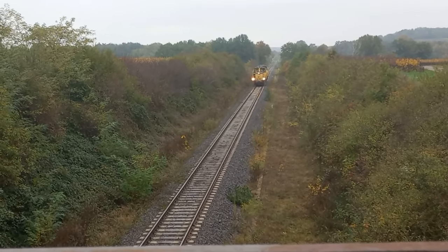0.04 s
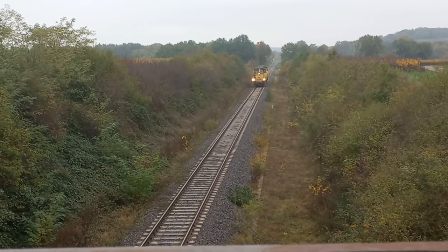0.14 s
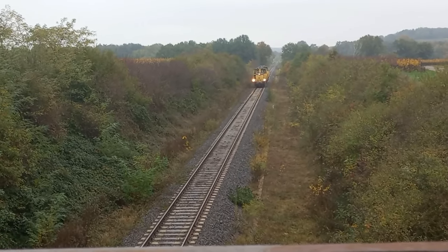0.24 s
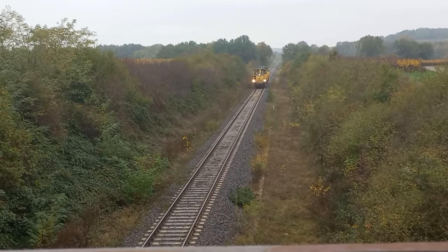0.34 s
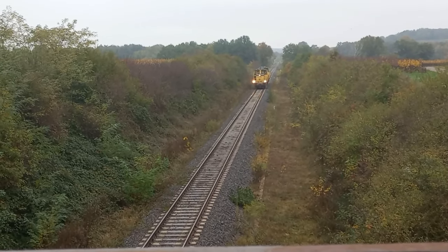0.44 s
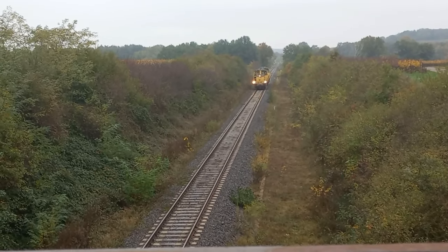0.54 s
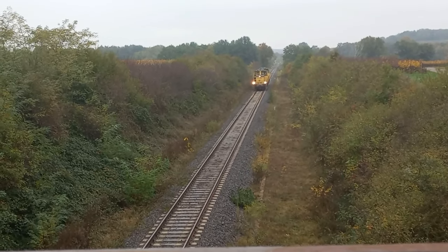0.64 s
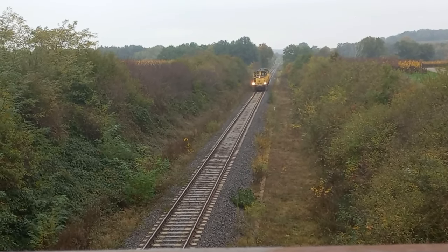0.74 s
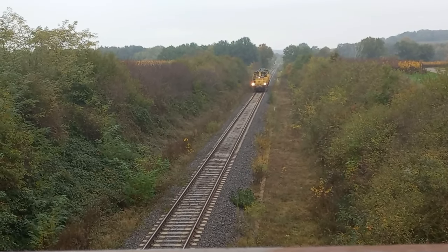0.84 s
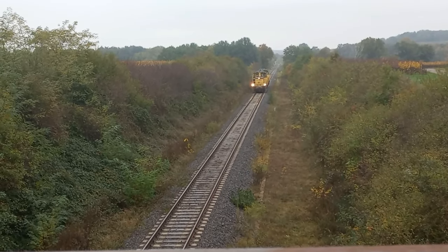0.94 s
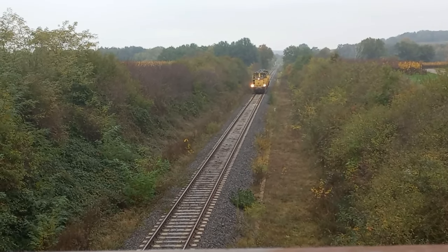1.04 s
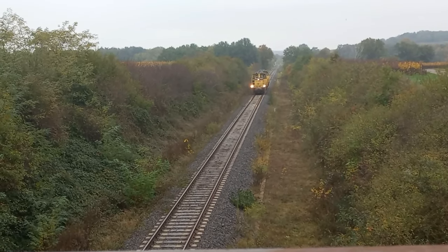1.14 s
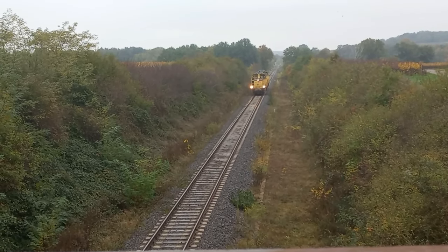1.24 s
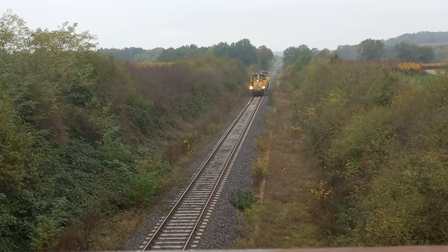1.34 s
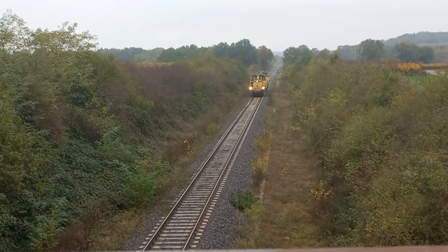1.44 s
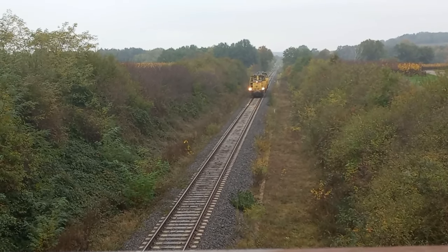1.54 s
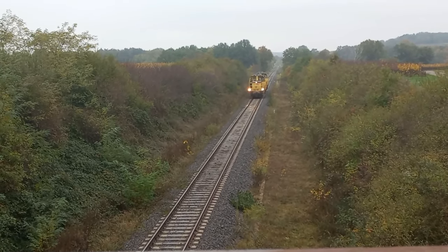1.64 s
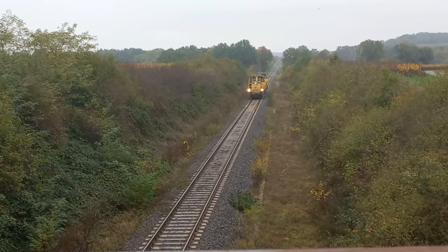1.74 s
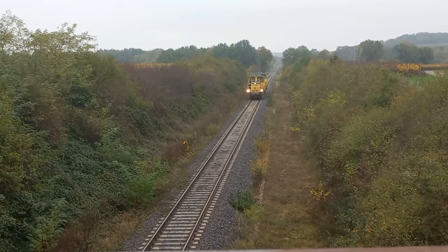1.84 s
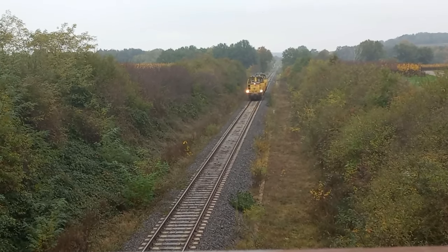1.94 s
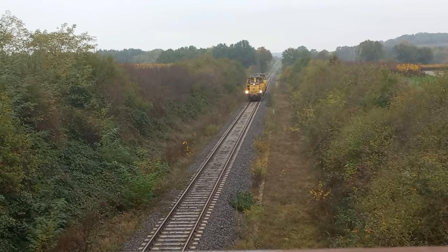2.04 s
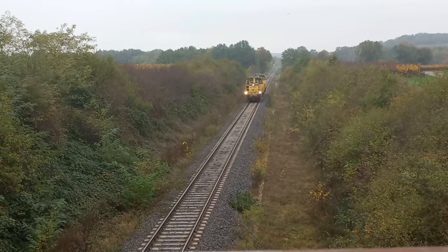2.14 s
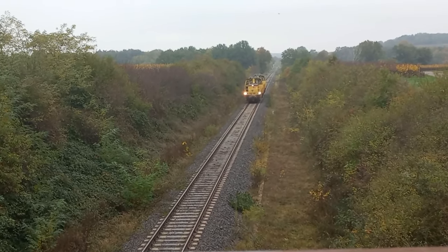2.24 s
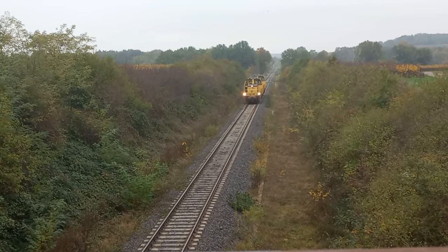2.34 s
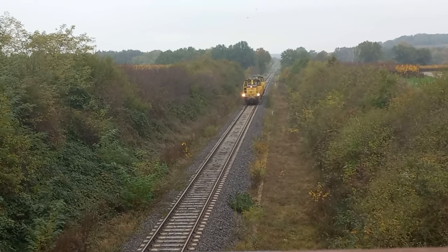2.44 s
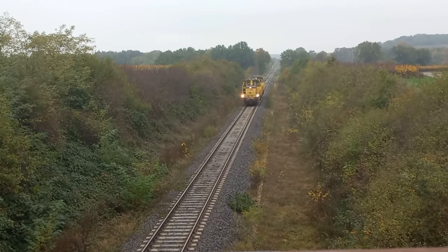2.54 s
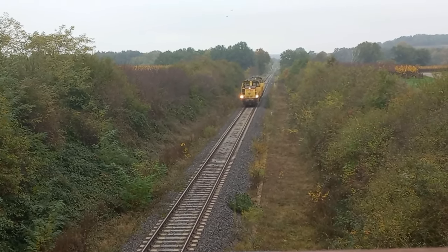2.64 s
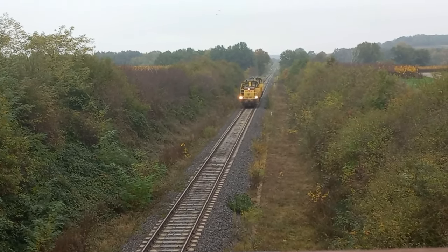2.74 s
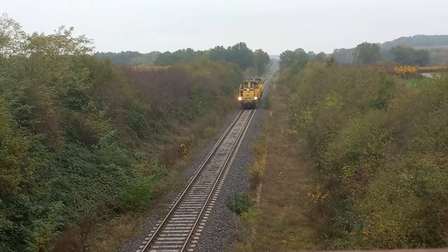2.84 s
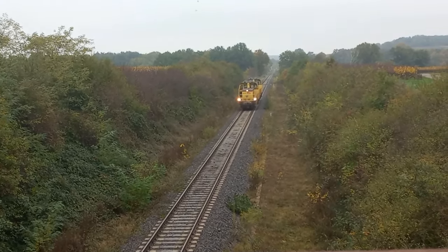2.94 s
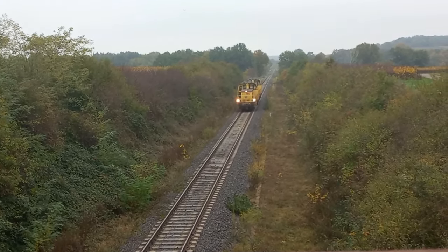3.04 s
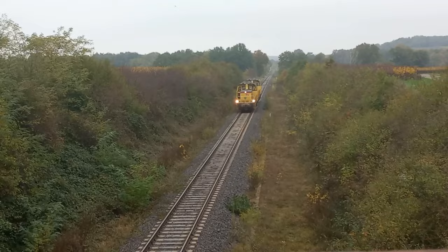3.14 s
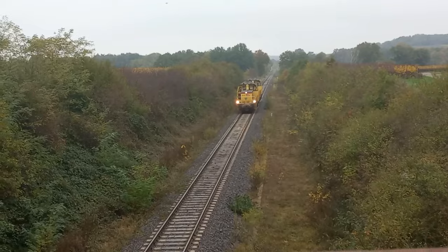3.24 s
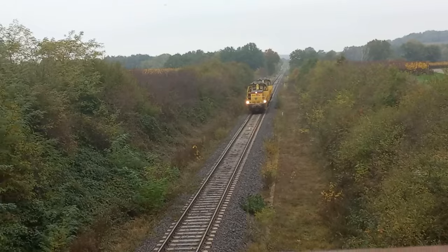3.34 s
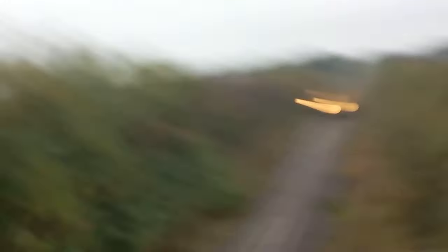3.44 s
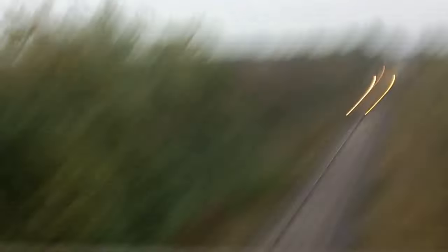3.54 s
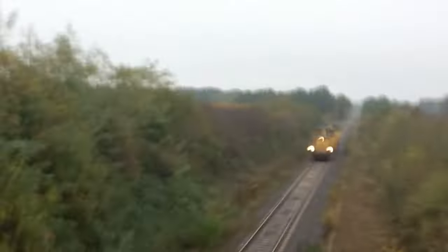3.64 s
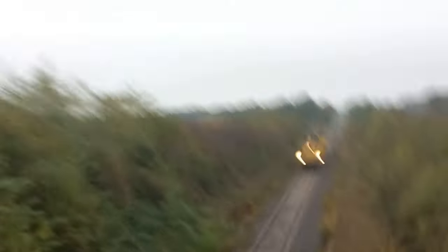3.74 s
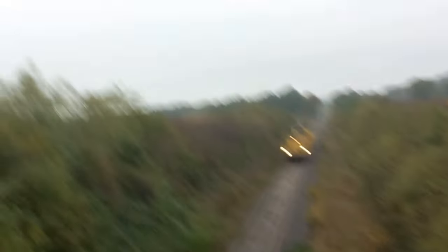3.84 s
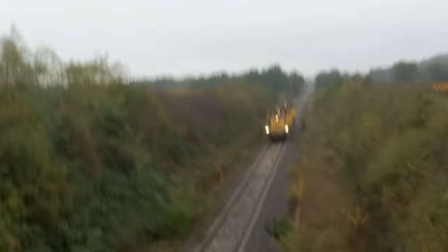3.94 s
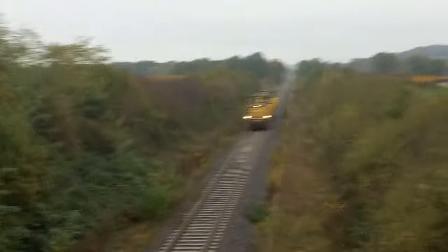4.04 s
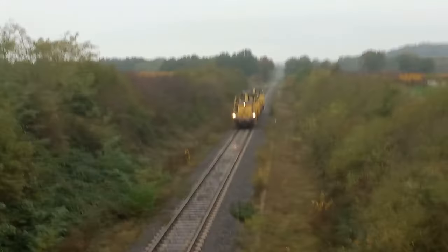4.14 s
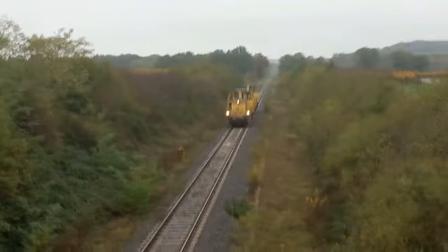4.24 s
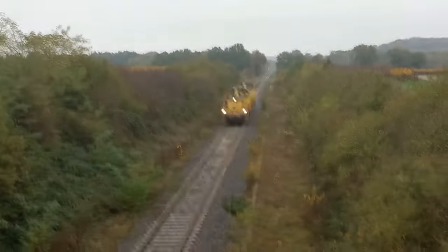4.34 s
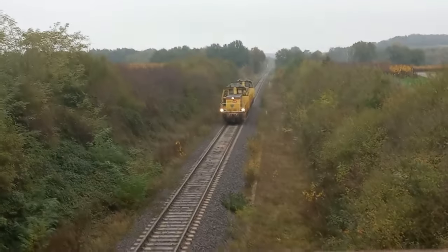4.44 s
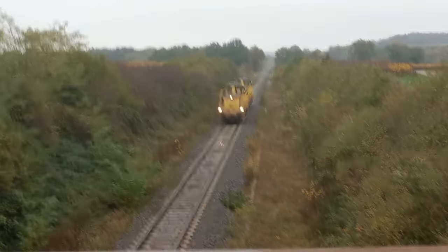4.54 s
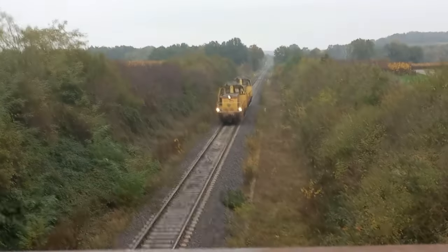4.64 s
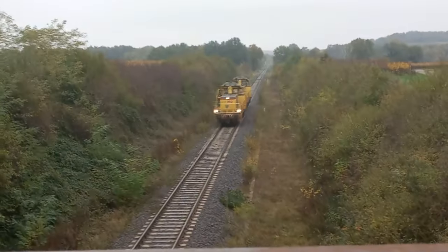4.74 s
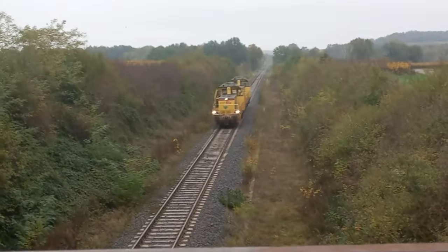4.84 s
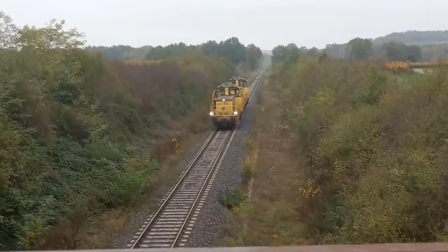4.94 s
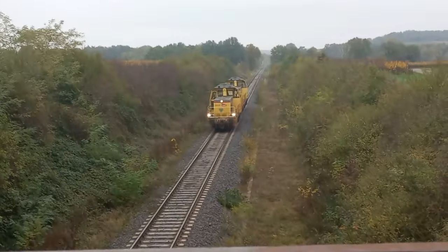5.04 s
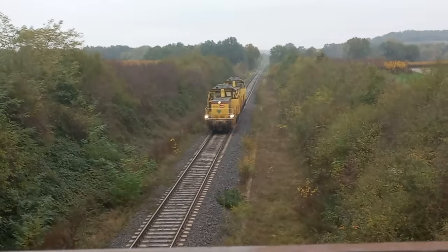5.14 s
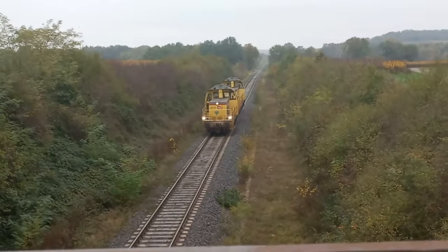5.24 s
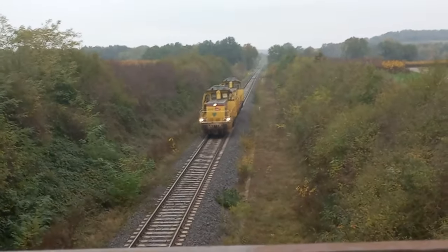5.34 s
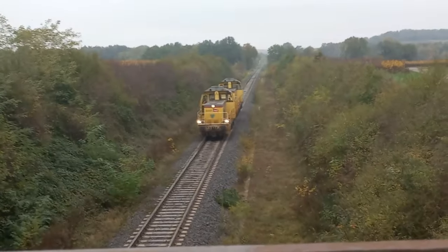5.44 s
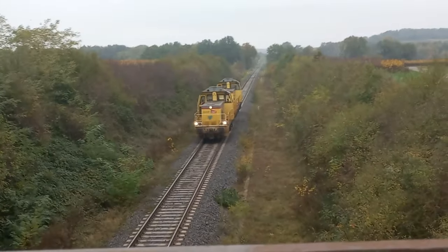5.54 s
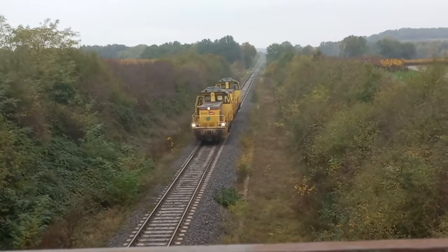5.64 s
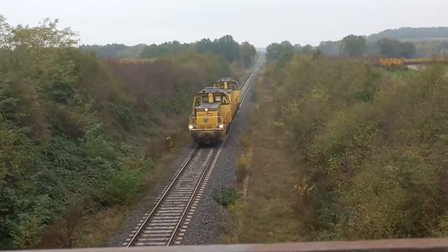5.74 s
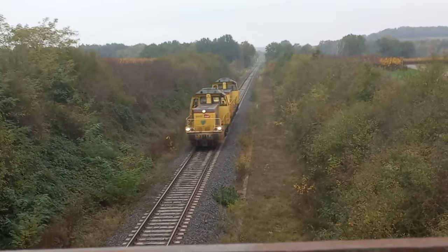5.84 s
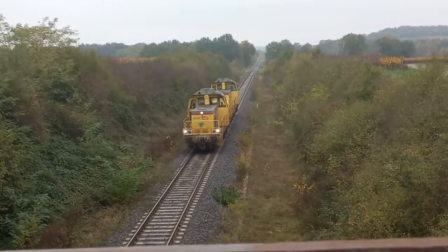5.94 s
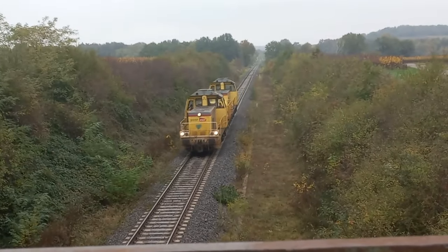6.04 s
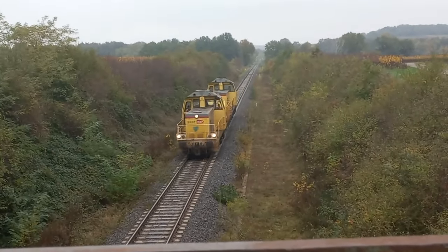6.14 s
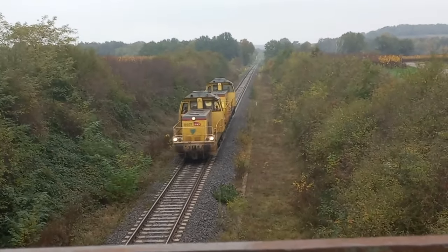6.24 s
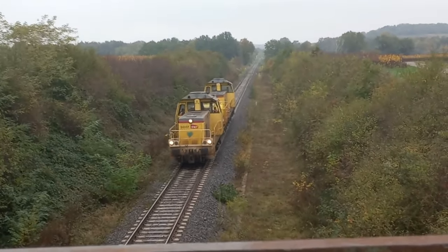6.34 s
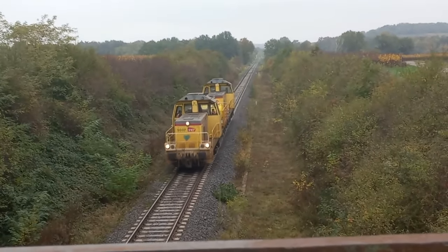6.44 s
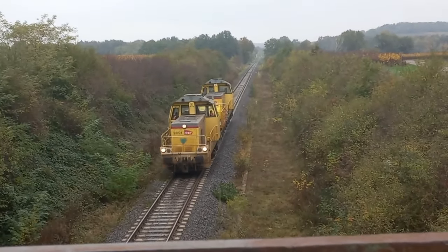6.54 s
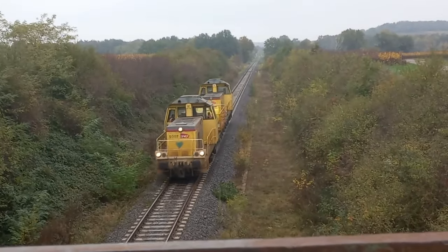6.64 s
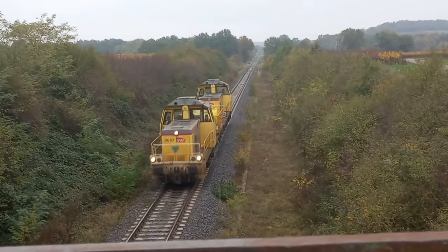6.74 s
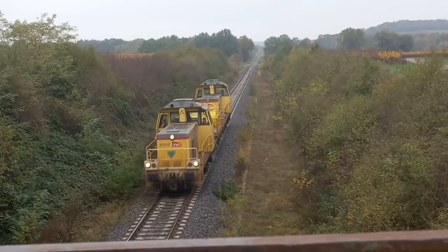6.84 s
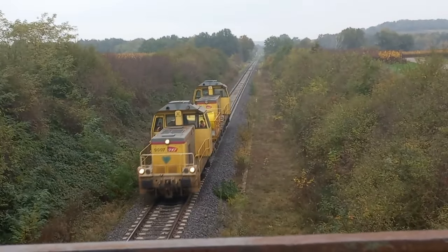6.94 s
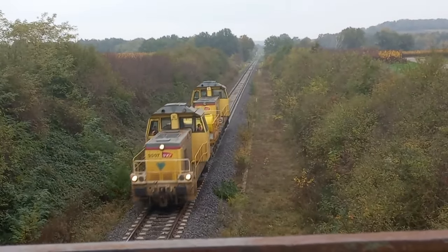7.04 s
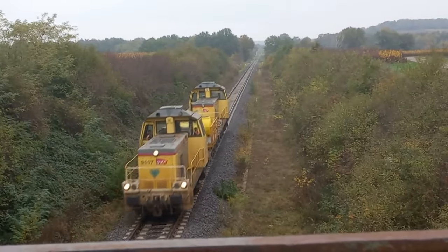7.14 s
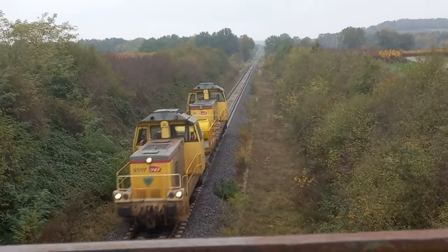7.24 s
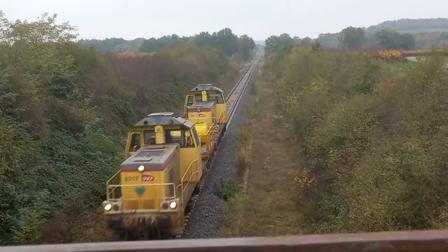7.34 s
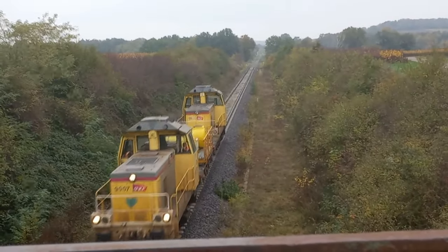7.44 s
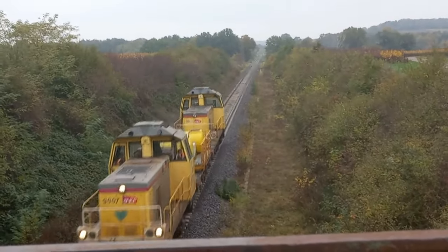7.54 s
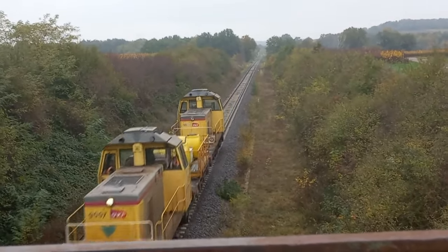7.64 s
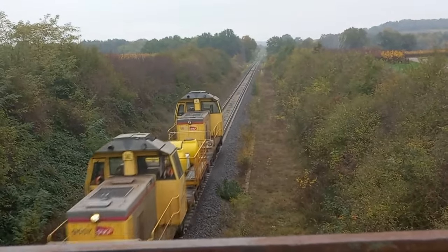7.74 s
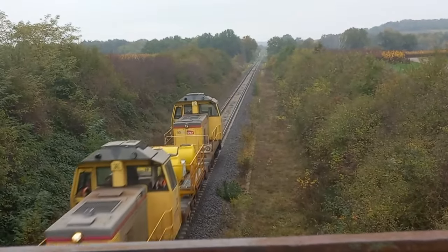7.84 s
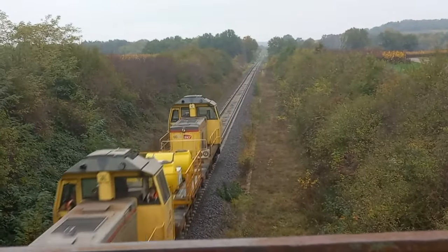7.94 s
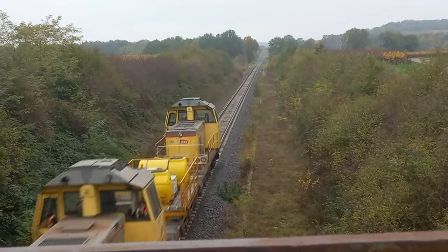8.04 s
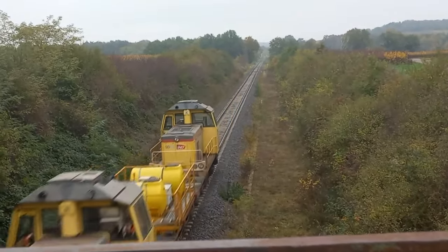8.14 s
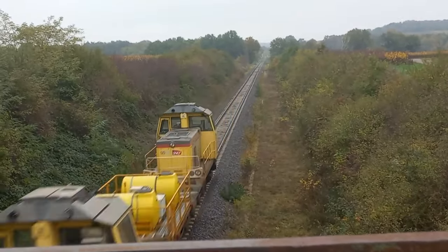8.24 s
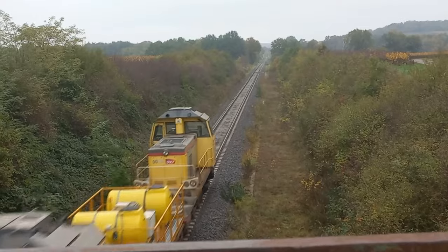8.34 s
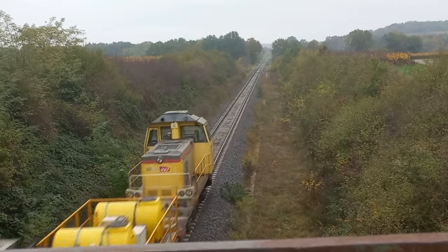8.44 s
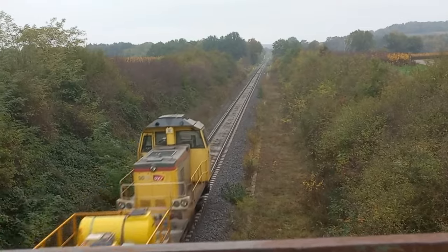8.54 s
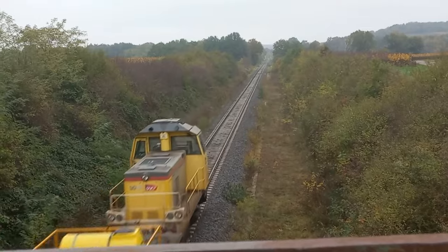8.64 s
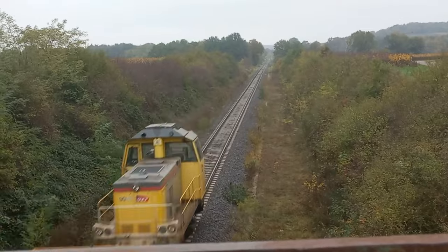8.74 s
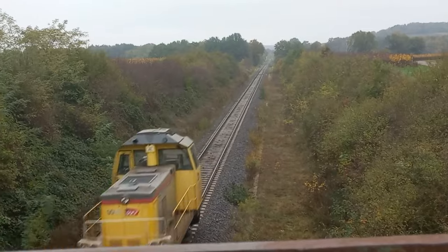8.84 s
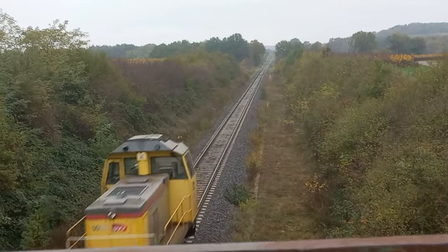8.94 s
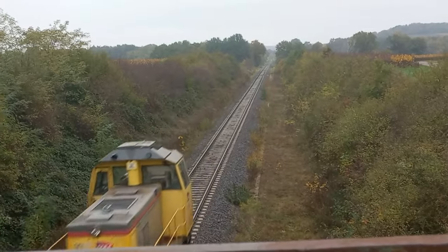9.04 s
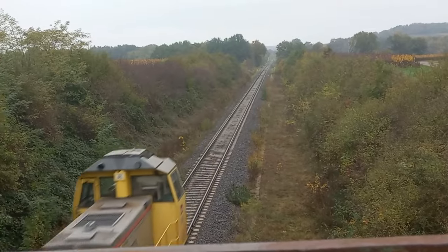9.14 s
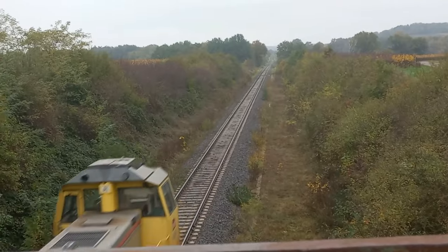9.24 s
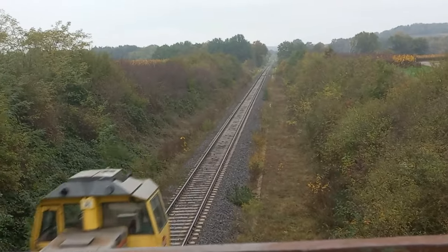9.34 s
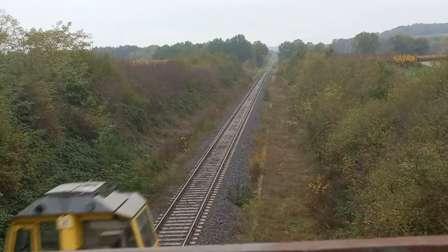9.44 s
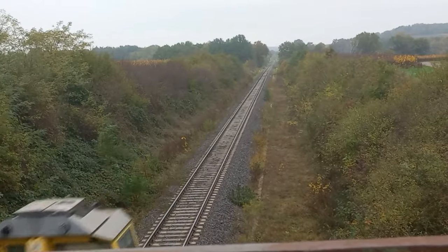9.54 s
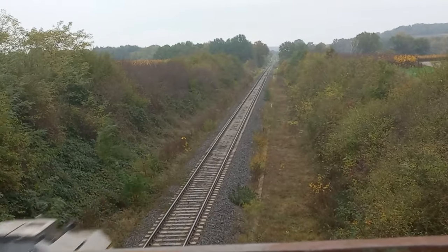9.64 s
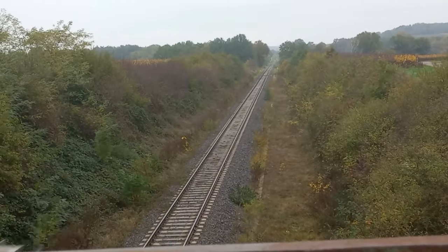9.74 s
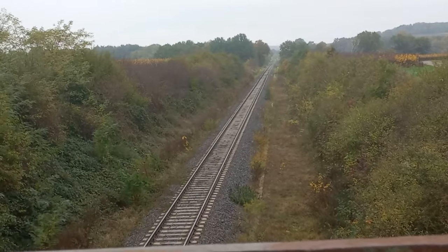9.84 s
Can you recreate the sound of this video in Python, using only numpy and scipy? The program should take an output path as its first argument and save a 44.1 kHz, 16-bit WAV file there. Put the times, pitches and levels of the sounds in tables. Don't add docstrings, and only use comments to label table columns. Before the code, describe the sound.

A diesel work train approaches through a railway cutting, gives a brief horn toot, then rumbles and clatters loudly right under the bridge.

```python
import sys
import numpy as np
from scipy import signal
from scipy.io import wavfile
from scipy.ndimage import uniform_filter1d

SR = 44100
rng = np.random.default_rng(int(sys.argv[2]) if len(sys.argv) > 2 else 0)


def volts(x):
    e = np.asarray(x, float) / 20
    return 10 ** e


def log_audio(samples):
    frames = np.atleast_2d(samples).T
    limited = np.clip(frames, -1, 1)
    pcm = np.round(limited * 32767).astype(np.int16)
    wavfile.write(sys.argv[1], SR, pcm)


N = 436590

# frequency in Hz, density in dB.
EXHAUST_NEAR_TONE = [(20, -36), (45, -33), (60, -10), (97, 6), (156, 9), (170, 2), (220, -39), (370, -120)]
# frequency in Hz, density in dB.
EXHAUST_FAR_TONE = [(20, -28), (45, -5), (60, -5), (97, 2.5), (156, -0.5), (170, 3), (220, -37),
                    (370, -120)]
# frequency in Hz, density in dB.
RUMBLE_TONES = [
    [(82, -37), (140, 14), (156, -8.5), (242, 27), (284, -2.5), (313, -18), (400, 0), (520, -35), (880, -120)],
    [(82, -40), (140, -15), (161, -5.5), (259, 7), (297, 0.5), (336, 4.5), (400, -30), (520, -40), (880, -120)],
]
# frequency in Hz, density in dB.
RING_TONES = [
    [(220, -15.5), (380, -6), (414, -9), (496, 1), (521, 0), (641, -12), (817, -7.5), (972, -22), (1000, -15), (1300, -59), (2200, -120)],
    [(220, -3), (380, -8.5), (419, -3.5), (542, 0), (750, -11), (1100, -12.5), (1430, -53), (2420, -120)],
]
# frequency in Hz, density in dB.
WHIRR_TONES = [
    [(950, -30), (1100, -0.5), (1320, 3), (1470, -3.5), (1690, 2), (1830, -2), (2200, -0.5), (2650, -4.5), (3200, -20), (3800, -6)],
    [(590, -41), (1000, -4.5), (1310, -3), (1550, 0), (3200, -5.5), (4160, -10.5), (7040, -120)],
]
# frequency in Hz, density in dB.
HISS_TONES = [
    [(1760, -39), (3000, 2.5), (3240, 0.5), (6990, -5), (8200, -17.5), (10700, -24.5), (18000, -120)],
    [(1760, 2), (3000, 2), (4490, 3), (6870, -0.5), (7290, -6), (8200, -36), (10700, -33), (18000, -120)],
]
# frequency in Hz, density in dB.
AIR_TONE = [(4470, -2.5), (7600, 0.5), (8060, -10), (8530, -3), (12100, 0.5), (15100, -0.5), (16000, 3)]
# frequency in Hz, correlation 0..1.
SAME_FAR = [(60, 1), (300, 0.98), (640, 0.99), (1400, 0.85), (3100, 0.78), (6800, 0.12), (15000, 0.065)]
# frequency in Hz, correlation 0..1.
SAME_NEAR = [(60, 1), (300, 0.97), (640, 0.88), (1400, 0.27), (3100, 0.36), (6800, 0.017), (15000, 0.046)]
# frequency in Hz, left-right in dB.
LEAN_DB = [(60, 4), (180, 0.0), (550, 0), (1650, 0.5), (4970, 2.5), (15000, 1.5)]
# time in seconds, level in dB.
APPROACH_DB = [(0, -53), (.5, -50.5), (1.5, -48.5), (2.5, -45.5), (3.2, -44.5), (4.1, -43.5), (4.9, -36.5),
               (5.8, -33.5), (6.5, -30.5), (7.0, -27.5), (7.6, -27.5), (8.2, -24.5), (8.9, -24.5),
               (9.4, -25), (9.9, -28)]
# peak in seconds, rise in seconds, fall in seconds, rumble lift in dB.
BOGIES = [
    (7.75, 0.43, 0.18, 9),
    (8.35, 0.6, 0.13, 1.5),
    (9.7, 0.5, 0.32, 3),
]
# peak in seconds, rise in seconds, fall in seconds, lift in dB.
FANS = [
    (8.85, 0.51, 0.73, 7),
    (9.84, 0.12, 0.19, 3),
]
# peak in seconds, rise in seconds, fall in seconds, lift in dB.
RAILS = [
    (6.6, .4, 0.56, 1.5),
    (8.15, 0.075, 0.17, 0.5),
    (9.7, 0.36, 0.22, 0),
]
# peak in seconds, rise in seconds, fall in seconds, lift in dB.
VENTS = [
    (8.7, 0.1, 0.17, 2),
    (9.0, 0.058, 0.03, 2.5),
]
# peak in seconds, rise in seconds, fall in seconds, change in dB.
BEND = [
    (0.3, 1, 0.69, -5),
]
# time in seconds, share 0..1.
ECHO_SHARE = [(0, 1), (6.9, 0.73), (7.9, 0.06)]
# time in seconds, delay in ms.
PARAPET_MS = [(0, 2.06), (6.8, 2.08), (8.3, 1.8), (9.9, 1.8)]
# time in seconds, right-port lag in samples.
LAG_SAMPLES = [(0, -2), (7, 2.5), (9.2, 7)]
# time in seconds, lift in dB.
HARD = [(.41, 8), (.59, 8), (.94, -9), (3.25, 9), (5.35, 9), (6.94, 4), (7.089, -4), (7.295, 8),
        (7.45, -1.5), (7.78, -2), (7.87, 7.5), (8.36, 3), (8.45, 9), (9.56, 8)]
# time in seconds, rate in cycles per second.
CYCLE_HZ = [(0, 5.69), (8.2, 5.69), (8.8, 5.5), (9.9, 5.4)]
CYLINDERS_DB = [0, -5, -14, -11, -10, -8, -11, -11, -14, -14, -10, -5]
# centre in Hz, width in Hz, level in dB.
THUD_MODES = [(73.5, 15.7, -4), (103.2, 9.1, 1), (128, 25, -6.5)]
# centre in Hz, width in Hz, level in dB.
BARK_MODES = [(190, 47, -1.5), (247, 19, -1.5), (281, 17, -34), (584, 38, -18)]
# start in seconds, length in seconds, level in dB.
BOOMS = [
    (8.86, .06, -30),
    (9.107, .42, -26),
    (9.85, .3, -30),
]
# time in seconds, peak in dB, pitch in Hz.
THUMPS = [(6.265, -18, 272), (6.907, -5, 225), (6.971, -12, 261), (7.075, -10, 251), (7.201, -13, 246),
          (7.26, -2, 233), (7.376, -10, 231), (7.497, -11, 266), (7.6, -9, 240), (7.672, -6, 245),
          (7.758, -4, 250), (7.788, -4, 205), (7.858, -5, 215), (7.945, -11, 250), (8.03, -9, 255),
          (8.065, -13, 250), (8.13, -13, 256), (8.198, -10, 276), (8.322, -6, 275), (8.443, -10, 219),
          (8.515, -12, 260), (8.809, -11, 269), (8.877, -10, 253), (9.032, -10, 224), (9.133, -9, 248),
          (9.349, -11, 250), (9.5, -7, 235), (9.53, -7, 255), (9.683, -9, 253), (9.743, -7, 255),
          (9.768, -8, 290)]
# time in seconds, upper in Hz, lower in Hz.
HUM_PITCH_HZ = [(7.2, 279, 244.5), (8.35, 278, 244), (8.6, 262, 217), (9.9, 261, 215)]
# peak in seconds, rise in seconds, fall in seconds, upper in dB, lower in dB.
HUMS = [
    (7.45, .1, .12, -36, -28),
    (7.7, .15, .15, -26, -28),
    (8.15, .2, .2, -27, -38),
    (9.07, .12, .15, -32, -25),
    (9.55, .25, .3, -26, -28),
]
# time in seconds, pitch in Hz.
WHINE_PITCH_HZ = [(8.3, 342.2), (9.5, 335.3), (9.9, 318.3)]
# peak in seconds, rise in seconds, fall in seconds, level in dB.
WHINES = [
    (8.45, .15, 0.11, -30),
    (8.85, 0.11, 0.075, -31),
    (9.72, 0.077, 0.39, -26),
]
# time in seconds, level in dB, pitch in Hz, t60 in seconds.
FIRING_KNOCKS = [
    (6.905, -17, 780, 0.029),
    (7.261, -14.5, 820, 0.045),
    (7.885, -23, 900, 0.075),
]
# time in seconds, level in dB, pitch in Hz.
CLANKS = [(1.365, -34, 514), (3.033, -35, 444), (4.02, -28, 515), (5.467, -19, 505), (6.121, -37, 503),
          (6.653, -15, 513), (7.366, -15, 557), (7.625, -23, 506), (7.85, -17, 520), (8.146, -11, 520),
          (8.68, -9.5, 523), (9.768, -17, 507)]
# time in seconds, level in dB, brightness in dB per octave.
HORN_LEVEL = [(3.283, -46, -16), (3.294, -22, -14), (3.2995, -15, -12), (3.303, -11, 0),
              (3.317, -12.5, 1.5), (3.326, -15.5, 2.3), (3.343, -16.5, 1.5), (3.352, -19, -2.5),
              (3.362, -23.5, -3), (3.385, -29, -2), (3.41, -42, -5)]
# time in seconds, pitch in Hz.
HORN_PITCH_HZ = [(3.283, 374), (3.292, 377), (3.298, 385), (3.304, 390), (3.32, 389.7), (3.335, 384),
                 (3.357, 382), (3.368, 386.8), (3.41, 386.5)]
# multiple of the pitch, level in dB.
HORN_ORDERS_DB = [(1, -5.5), (2, 2), (3, -0.5), (4, -9), (5, -10), (6, -10), (7, -14), (9, -14), (11, -19),
                  (12, -18.5), (14, -23), (19, -28), (20, -35)]
# time in seconds, first in dB, third in dB.
HORN_BLOOM_DB = [(3.295, 2, -9), (3.304, -2, -1), (3.314, 2, 4), (3.324, 1.5, 3), (3.335, 0, 0),
                 (3.346, -3, -3), (3.357, -5, -4.5), (3.37, -3, -7), (3.385, -1, -5)]
# delay in seconds, level in dB, centre in Hz, width in Hz, share of the blast.
ECHOES = [(.055, -24, 1950, 700, .6), (.06, -27, 4000, 900, .5), (.085, -30, 2300, 900, .6),
          (.14, -19, 390, 300, 1), (.185, -21, 390, 300, 1), (.158, -24, 1000, 1300, .45),
          (.158, -12, 1900, 450, .42), (.158, -23, 3100, 500, .35), (.19, -31, 3500, 900, .5),
          (.243, -24, 1950, 500, .33), (.235, -33, 1160, 400, .35), (.31, -33, 2900, 1300, .6),
          (.36, -36, 1160, 400, .8), (.4, -32, 3000, 1600, .6), (.45, -34, 3000, 1300, .6)]
# frequency in Hz, t60 in seconds.
CUTTING_T60_S = [(400, 1.5), (800, 0.4), (1200, 2.6), (3000, 2.0), (4500, 1), (6000, 0.6), (9000, 0.06)]
# time in seconds, level in dB, share of a blast.
FAR_TOOTS = [
    (3.09, -25, 0.36),
    (3.818, -22, 0.6),
]
# time in seconds, level in dB, left-right in dB, t60 in seconds, knock in dB.
CLICKS = [(3.3974, -34, 9, 0.015, -16), (3.4685, -32, 6, 0.02, -25), (3.5189, -34, -4, 0.025, -25),
          (3.535, -26, -9, 0.034, -26), (3.541, -34, -10, .03, -26), (3.5935, -29, 4.0, 0.004, -25),
          (3.678, -52, -19, 0.03, -40), (3.706, -43, 2, 0.02, -16.5), (4.4503, -18, -14, 0.009, -27),
          (4.452, -29, -20, .01, -27), (4.4867, -21.5, -19, 0.019, -24), (4.4914, -24, -9.0, 0.02, -22),
          (4.5025, -25, -11, .02, -8), (4.5038, -22.5, -15, 0.014, 2), (4.5053, -25, -14, .014, -4),
          (4.5405, -29, -17, 0.02, -29), (4.542, -32, -17, .02, -29), (4.5435, -29, -17, 0.02, -29),
          (4.545, -33, -17, .02, -29), (4.563, -35, -9, 0.025, -19), (4.6144, -37, -5, 0.03, -19),
          (4.628, -33, -16, 0.025, -20)]
# centre in Hz, width in Hz, level in dB.
CASING_MODES = [(6940, 630, -15), (8250, 410, -14), (12500, 810, -11), (13500, 590, 1)]
# start in seconds, length in seconds, level in dB.
RUBS = [
    (3.347, 0.19, -46),
    (3.57, .2, -65),
    (4.43, 0.29, -66),
    (4.46, .02, -58),
    (4.515, .025, -70),
]
# start in seconds, length in seconds, level in dB, from in Hz, to in Hz.
CHIRPS = [
    (.79, .03, -91, 7500, 7200),
    (.83, .03, -87, 7400, 7200),
    (.865, .035, -71, 7600, 7100),
    (.9, 0.023, -76, 7400, 7100),
]

SIZE, HOP = 1024, 256
EDGE_HZ = 15830
# (dB over the approach at its loudest, share of the climb)
EXHAUST_LAW, RUMBLE_LAW, RING_LAW, WHIRR_LAW = (-1.5, 0.87), (1, 1.08), (-1.72, 0.9), (-14, 0.87)
THUD_DB, BARK_DB, HISS_DB, AIR_DB = -4, -4.5, -2.5, -1
OVERHEAD_S, AIR_LOSS_DB_PER_S, SHADE_DB_PER_S, AIR_FLOOR_DB = 9.06, 2, 8.5, -57.5
TREBLE_TILT = 1
CLOSING_S, NEAR_BEFORE = (6.65, 7.5), 0.09
ARCH_S, ARCH_SHARE = (7.85, 8.07), 0.94
RAIL_MS, RAIL_SHARE, SWAP_HZ = 1.86, 0.4, 3700
HARD_RISE_S, HARD_FALL_S = 0.016, 0.0091
THROB_DB, LOPE_DB = 1.4, 1
STRONG_S = 7.26
DRONE_HZ, BOOM_EDGE_S = 91.7, 0.081
THUMP_RISE_S, THUMP_T60_S, THUMP_GLIDE, THUMP_DB = 0.003, 0.2, 0.15, -2
DUCK_BEFORE_S, DUCK_AFTER_S, DUCK_DB, RUMBLE_TRIM_DB = 0.018, 0.03, -9, -0.5
HUM_WAVER_DB = 3.5
CLANK_T60_S, CLANK_WIDTH_HZ, CLANK_DB = 0.058, 140, -3
ORDER_FALL_DB, AIR_LEAK = 0.7, 0.06
SIZZLE_ORDER, SIZZLE_WIDTH, SIZZLE_DB = 32, 4, 4.5
FAR_FACTOR, TOOT_HZ = 1.115, 1620
TAIL_START_SAMPLES = 1800
SOAKED = 0.65
RUB_EDGE_S = 0.012
BASS_CUT_HZ, BASS_LEAK_DB = 67, -29


def roar(patchy_db=1.07, clatter_db=0.35):
    frames, hz = N // HOP + 5, np.fft.rfftfreq(SIZE, 1 / SR)
    t = np.arange(frames) * HOP / SR
    near = np.interp(t, CLOSING_S, (NEAR_BEFORE, 1))
    under = np.interp(t, ARCH_S, (0, ARCH_SHARE))
    comb = parapet_comb(hz, t, near)

    cycle = 2 * np.pi * cycles(t)
    throb_db = THROB_DB * (1 - under) * (np.cos(cycle) + np.cos(2 * cycle))
    clatter = clatter_db * wander(t, 25.)
    hard_db = sum(db * swell(t, s, HARD_RISE_S, HARD_FALL_S) for s, db in HARD)
    vent_db = sum(db * swell(t, *bell) for *bell, db in VENTS)
    lost_db = np.maximum(AIR_LOSS_DB_PER_S * (OVERHEAD_S - t), SHADE_DB_PER_S * (t - OVERHEAD_S))

    exhaust_db = part(EXHAUST_LAW, t, BEND) + LOPE_DB * wander(t, 8.) - 3.0 + throb_db
    rumble_db = part(RUMBLE_LAW, t, BOGIES) + hard_db + duck_db(t) - 0.5 + throb_db
    ring_db = part(RING_LAW, t, RAILS) + 0.09 * clatter
    whirr_db = part(WHIRR_LAW, t, FANS)
    hiss_db = whirr_db + HISS_DB + vent_db - 0.65 * SHADE_DB_PER_S * np.maximum(t - OVERHEAD_S, 0)
    air_db = whirr_db + AIR_DB + vent_db + np.maximum(-lost_db, AIR_FLOOR_DB)

    power = layer((EXHAUST_FAR_TONE, EXHAUST_NEAR_TONE), exhaust_db, hz, under, comb)
    power += layer(RUMBLE_TONES, rumble_db, hz, under, comb)
    power += layer(RING_TONES, ring_db, hz, under, comb)
    power += layer(WHIRR_TONES, whirr_db + clatter, hz, under, comb)
    power += layer(HISS_TONES, hiss_db + clatter, hz, under, comb)
    power += layer((AIR_TONE, AIR_TONE), air_db + 2.0 * clatter, hz, under, comb)
    power *= volts(-TREBLE_TILT * np.outer((hz / EDGE_HZ) ** 4, lost_db)) ** 2

    a, b, c, d, patches = rng.standard_normal((frames, len(hz), 5)).T
    patches = uniform_filter1d(patches, size=5, axis=0)
    patches = evened(uniform_filter1d(patches, size=12, axis=1))
    same = np.outer(read(SAME_FAR, hz), 1 - near) + np.outer(read(SAME_NEAR, hz), near)
    same = np.clip(same, -1, 1)
    (lag,) = follow(LAG_SAMPLES, t)
    left = a + 1j * b
    right = same * left + np.sqrt(1 - same ** 2) * (c + 1j * d)
    right = right * np.exp(-2j * np.pi * np.outer(hz, lag) / SR)
    lean = volts(read(LEAN_DB, hz) / 2)[:, None]
    z = np.array([left * lean, right / lean]) * np.sqrt(power) * volts(patchy_db * patches)
    return volts(3.0) * signal.istft(z, nperseg=SIZE, noverlap=SIZE - HOP)[1][:, :N]


def parapet_comb(hz, t, near):
    (share,), (delay_ms,) = follow(ECHO_SHARE, t), follow(PARAPET_MS, t)
    share = np.clip(share, 0, .9)
    low = np.exp(-(hz / SWAP_HZ) ** 6)
    strength = share * (np.exp(-hz / 1700.0) * low)[:, None]
    comb = abs(1 - strength * np.exp(-2j * np.pi * np.outer(hz, delay_ms) / 1000)) ** 2
    handrail = (1 - low) * np.exp(-2j * np.pi * hz * RAIL_MS / 1000)
    comb *= abs(1 - RAIL_SHARE * np.outer(handrail, 1 - near)) ** 2
    comb[hz < 900] = 1
    return comb


def engines(uneven=0.35, jitter_db=1.5, jitter_s=0.0003):
    t, count = np.arange(N) / SR, len(CYLINDERS_DB)
    turns = cycles(t)
    firing = np.arange(int(turns[0] * count), int(turns[-1] * count))
    cylinder = firing % count
    offset, chance = rng.uniform(-1.067, 1, count), rng.standard_normal((len(firing), 2))
    offset[0] = 0
    at_s = np.interp((firing + uneven * offset[cylinder]) / count, turns, t) + jitter_s * chance[:, 0]
    pulses = np.zeros(N)
    at = np.clip((at_s * SR).astype(int), 0, N - 1)
    pulses[at] = volts(np.take(CYLINDERS_DB, cylinder) + jitter_db * chance[:, 1])
    thud = evened(sum(volts(db) * resonate_twice(pulses, hz, 2 * width) for hz, width, db in THUD_MODES))
    bark = evened(sum(volts(db) * resonate_twice(pulses, hz, 2 * width) for hz, width, db in BARK_MODES))
    thud_db = part(EXHAUST_LAW, t, BEND) + THUD_DB
    bark_db = part(RUMBLE_LAW, t, BOGIES) + BARK_DB + np.interp(t, t[::HOP], duck_db(t[::HOP]))
    boom = np.sqrt(2) * np.sin(2 * np.pi * DRONE_HZ * t)
    boom = boom * sum(volts(db) * hold(t, s, length, BOOM_EDGE_S) for s, length, db in BOOMS)
    return thud * volts(thud_db) + bark * volts(bark_db) + boom


def thumps():
    out, t = np.zeros(N), np.arange(8000) / SR
    for s, db, hz in THUMPS:
        turns = np.cumsum(hz * (1 - THUMP_GLIDE * np.exp(-t / 0.012))) / SR
        level = volts(db + THUMP_DB - 60 * t / THUMP_T60_S) * (1 - np.exp(-t / THUMP_RISE_S))
        add(out, s, level * np.sin(2 * np.pi * turns))
    return out


def hum():
    t, slow = np.arange(N) / SR, np.arange(0, N + HOP, HOP) / SR
    levels = sum(volts([[upper_db], [lower_db]]) * swell(slow, *bell) for *bell, upper_db, lower_db in HUMS)
    wavering = []
    for level in levels:
        waver = volts(HUM_WAVER_DB * wander(slow, 10) + duck_db(slow) / 2)
        wavering.append(np.interp(t, slow, level * waver))
    tones = np.sin(2 * np.pi * np.cumsum(follow(HUM_PITCH_HZ, t), axis=1) / SR)
    return (wavering * tones).sum(0) * np.sqrt(2)


def whine():
    t = np.arange(N) / SR
    turns = np.cumsum(follow(WHINE_PITCH_HZ, t)[0]) / SR
    fuzz = evened(resonate(rng.standard_normal(N), 0, 20.0) + 0.017)
    level = sum(volts(db) * swell(t, *bell) for *bell, db in WHINES)
    return np.sqrt(2) * fuzz * np.sin(2 * np.pi * turns) * level


def firing_knocks():
    out, t = np.zeros(N), np.arange(4000) / SR
    for s, db, hz, t60 in FIRING_KNOCKS:
        knock = evened(resonate_twice(rng.standard_normal(len(t)), hz, 280))
        add(out, s, volts(db - 4.5 - 60 * t / max(t60, .01)) * knock * (1 - np.exp(-t / 0.0026)))
    return out


def clanks():
    out, t = np.zeros(N), np.arange(4000) / SR
    for s, db, hz in CLANKS:
        rough = evened(resonate(rng.standard_normal(len(t)), hz, CLANK_WIDTH_HZ))
        ring = np.sin(2 * np.pi * hz * t) + 0.31 * rough
        add(out, s, volts(db + CLANK_DB - 60 * t / CLANK_T60_S) * ring * (1 - np.exp(-t / 0.0012)))
    return out


def horn(tail_db=-23.5):
    out, start, direct = np.zeros((2, N)), HORN_LEVEL[0][0], blast()
    bright = direct - resonate(direct, 0, 2300) / 2
    add(out, start, direct + bright * np.array([[.2], [-.2]]))
    for delay, db, hz, width, share in ECHOES:
        echo = clipped(resonate_twice(direct, hz, width), share)
        add(out, start + delay, volts(db) * echo * rng.uniform(.8, 1.2, (2, 1)))
    for s, db, share in FAR_TOOTS:
        toot = resonate(resonate(blast(FAR_FACTOR), TOOT_HZ, 560), TOOT_HZ, 520)
        add(out, s, volts(db) * clipped(toot, share)[None])
    add(out, start, volts(tail_db) * cutting(direct - SOAKED * resonate(direct, 1060, 740)))
    return out


def blast(factor=1):
    t = np.arange(HORN_LEVEL[0][0], HORN_LEVEL[-1][0], 1 / SR)
    level_db, tilt_db = follow(HORN_LEVEL, t)
    first_db, third_db = follow(HORN_BLOOM_DB, t)
    turns = np.cumsum(follow(HORN_PITCH_HZ, t)[0] * factor) / SR
    lead_rad = {1: 2.2, 2: .4, 3: .4, 4: 1}
    tone = 0
    for k in range(1, 41):
        db = follow(HORN_ORDERS_DB, k)[0] - ORDER_FALL_DB * max(k - HORN_ORDERS_DB[-1][0], 0)
        db = db + SIZZLE_DB * swell(k, SIZZLE_ORDER, SIZZLE_WIDTH, SIZZLE_WIDTH)
        db = db + (k == 1) * first_db + (k == 3) * third_db + tilt_db * max(np.log2(k / 2), 0)
        tone = tone + volts(db) * np.cos(2 * np.pi * k * turns + lead_rad.get(k, 0))
    leak = AIR_LEAK * volts(tilt_db) * evened(resonate(rng.standard_normal(len(t)), 2700, 5000))
    return volts(level_db - 2.5) * (tone + leak)


def cutting(x):
    taps = np.zeros((2, SR))
    at = np.arange(600, SR - 20, 20) + rng.integers(0, 20, (2, (SR - 601) // 20))
    np.put_along_axis(taps, at, rng.choice([-1., 1.], at.shape), 1)
    taps *= np.clip(np.arange(SR) / TAIL_START_SAMPLES - 1 / 3, 0, 1)
    hz, t, z = signal.stft(taps, SR, nperseg=256)
    decay = volts(-60 * t / read(CUTTING_T60_S, hz)[:, None])
    tail = signal.istft(z * decay, SR, nperseg=256)[1]
    return signal.fftconvolve(x[None], tail / np.linalg.norm(tail[0]), axes=1)


def fingers():
    out, t = np.zeros((2, N)), np.arange(3000) / SR
    for s, db, pan_db, t60, knock_db in CLICKS:
        scrape = rng.standard_normal((2, len(t))) * volts(-60 * t / max(t60, .003))
        scrape[1] = 0.23 * scrape[0] + 0.92 * scrape[1]
        ring = sum(volts(level) * resonate(scrape, hz, width) for hz, width, level in CASING_MODES)
        crisp = np.diff(scrape, prepend=0)
        knock = volts(knock_db + 12.5) * resonate_twice(scrape, 4060, 380) * np.exp(-t / 0.0055)
        click = 0.026 * crisp + ring + knock + 0.16 * scrape * np.exp(-t / 0.0013)
        add(out, s, volts(db + np.array([[pan_db], [-pan_db]]) / 2) * click)
    slide = resonate(resonate(rng.standard_normal((2, N)), 14400, 5300), 6200, 5000) * volts([[-3], [3]])
    return out + slide * sum(volts(db) * hold(np.arange(N) / SR, s, length, RUB_EDGE_S) for s, length, db in RUBS)


def bird():
    out = np.zeros(N)
    for s, length, db, from_hz, to_hz in CHIRPS:
        count = int(length * SR)
        turns = np.cumsum(np.linspace(from_hz, to_hz, count)) / SR
        add(out, s, volts(db) * np.hanning(count) * np.sin(2 * np.pi * turns))
    return out


def part(law, t, passes=()):
    over_db, climb = law
    near_db = follow(APPROACH_DB, t)[0]
    top_db = max(db for s, db in APPROACH_DB)
    lift_db = sum(db * swell(t, *bell) for *bell, db in passes)
    return top_db + over_db + climb * (near_db - top_db) + lift_db


def duck_db(t):
    dips = sum(DUCK_DB * swell(t, s + 0.012, DUCK_BEFORE_S, DUCK_AFTER_S) for s, db, hz in THUMPS)
    return RUMBLE_TRIM_DB + np.maximum(dips, DUCK_DB)


def cycles(t):
    count = np.cumsum(follow(CYCLE_HZ, t)[0]) * (t[1] - t[0])
    return count - np.interp(STRONG_S, t, count)


def layer(tones, level_db, hz, under, colour):
    power = (spectrum(tones[0], hz) * (1 - under) + spectrum(tones[1], hz) * under) * colour
    return power / power.sum(0) * volts(level_db) ** 2


def spectrum(tone, hz):
    power = volts(read(tone, hz)) ** 2 * (hz >= tone[0][0]) * (hz <= tone[-1][0])
    return (power / power.sum())[:, None]


def read(points, hz):
    f, value = np.transpose(points)
    return np.interp(np.log(hz + 1), np.log(f + 1), value)


def follow(rows, t):
    s, *columns = np.transpose(rows)
    return [np.interp(t, s, c) for c in columns]


def swell(t, s, rise, fall):
    return np.exp(-((t - s) / np.where(t < s, rise, fall)) ** 2)


def hold(t, s, length, edge):
    return np.clip(np.minimum(t - s + edge, s + length + edge - t) / edge, 0, 1)


def wander(t, rate):
    speeds = np.geomspace(rate / 20, rate, 20)
    return evened(sum(np.sin(2 * np.pi * (f * t + rng.random())) / np.sqrt(f) for f in speeds))


def evened(x):
    return x / np.sqrt(np.mean(x ** 2) + 1e-20)


def resonate(x, hz, width):
    r = np.exp(-np.pi * width / SR)
    return 2 * signal.lfilter([1 - r], [1, -r * np.exp(2j * np.pi * hz / SR)], x).real


def resonate_twice(x, hz, width):
    return resonate(resonate(x, hz, width), hz, width)


def clipped(x, share):
    return x * np.clip(8 * (share - np.linspace(0, 1, len(x))), 0, 1)


def add(mix, s, sound):
    target = mix[..., round(s * SR):][..., :sound.shape[-1]]
    target += sound[..., :target.shape[-1]]


def scene():
    train = roar() + engines() + hum() + firing_knocks() + clanks()
    return train + horn() + fingers() + bird() + whine() + thumps()


def top_cut(x):
    return signal.sosfilt(signal.butter(12, 16990, fs=SR, output="sos"), x)


def record(dry):
    bass_cut = signal.butter(8, BASS_CUT_HZ, "high", fs=SR, output="sos")
    mix = signal.sosfilt(bass_cut, dry) + volts(BASS_LEAK_DB) * dry
    band_limit = signal.firwin(511, EDGE_HZ, window=("kaiser", 9), fs=SR)
    mix = signal.oaconvolve(mix, band_limit[None], "same")
    return top_cut(mix)


dry = scene()
out = record(dry)
log_audio(out)
```